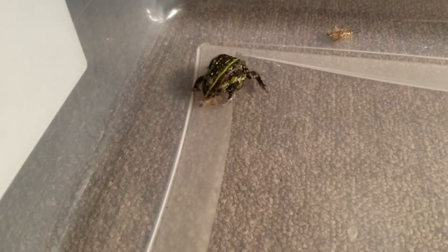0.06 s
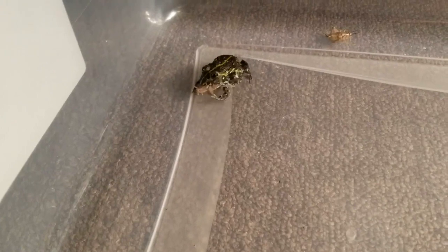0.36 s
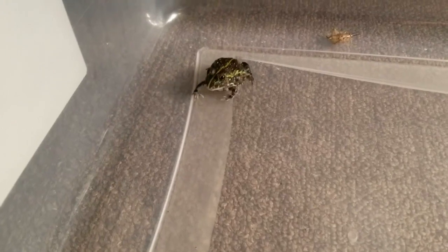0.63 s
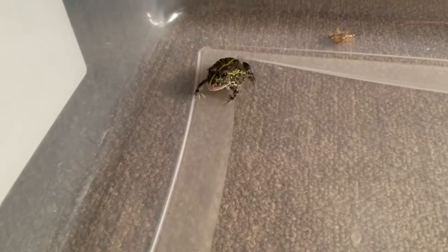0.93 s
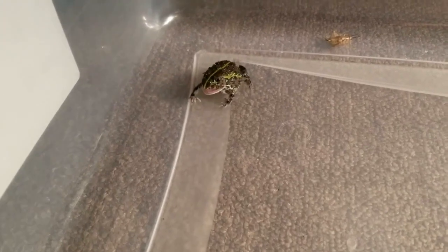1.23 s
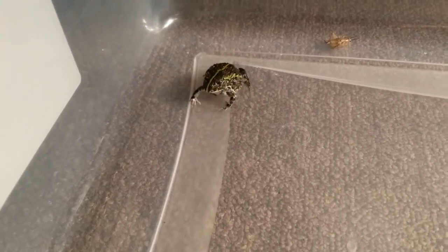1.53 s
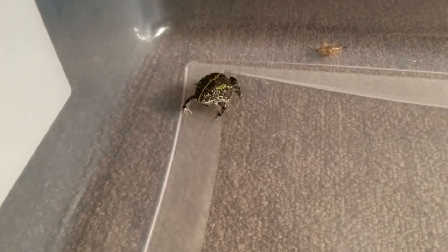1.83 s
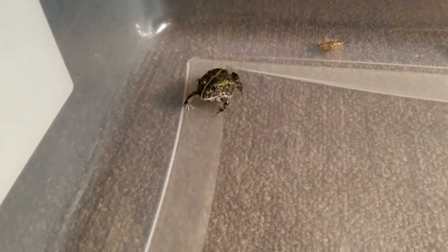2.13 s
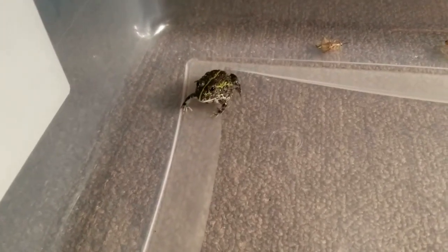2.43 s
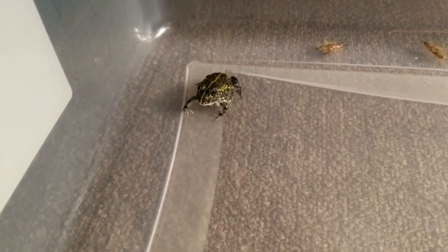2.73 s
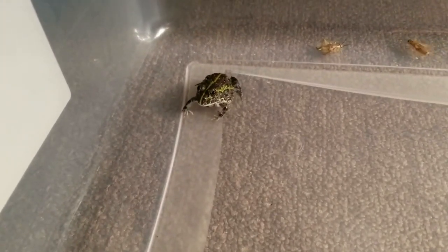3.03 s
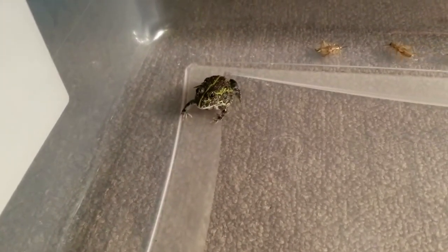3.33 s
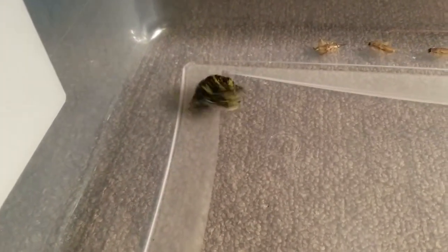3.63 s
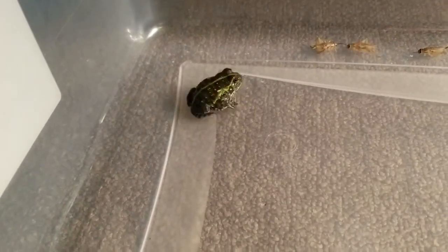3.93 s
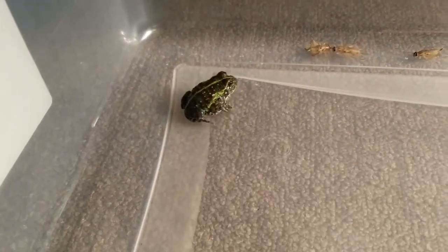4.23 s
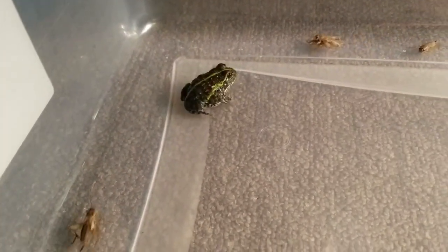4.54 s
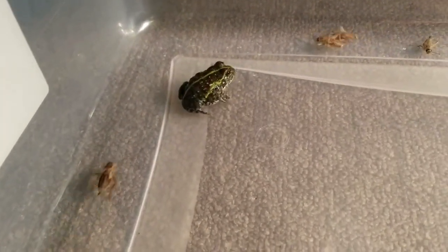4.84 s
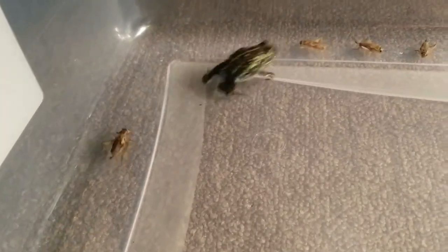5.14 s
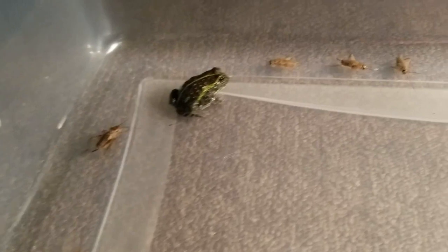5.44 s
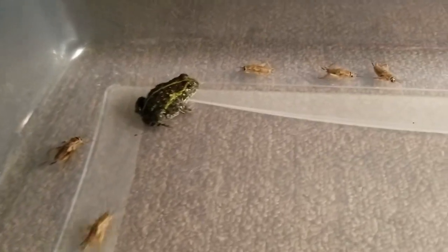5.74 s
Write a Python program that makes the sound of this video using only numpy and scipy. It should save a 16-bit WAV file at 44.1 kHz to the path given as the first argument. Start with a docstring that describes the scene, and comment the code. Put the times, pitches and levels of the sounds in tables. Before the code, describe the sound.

Crickets scrabble and tick across a plastic tub over a low room hum, after a few sharp, dry taps on the microphone.

```python
"""A frog and a handful of crickets in a plastic tub, on a pair of close microphones indoors.
An appliance hums in the room throughout, and at first the crickets barely stir. In the first second
and a half, four sharp dry taps and a few faint ones sound right at the left microphone. From about
2.5 s the crickets scrabble over the plastic: a dense rustle of tiny claw contacts shaking the walls,
with louder ticks and scuffs as they and the frog shift and hop."""
import sys
import numpy as np
from scipy import signal
from scipy.fft import rfft, irfft
from scipy.io import wavfile

SR = 44100
rng = np.random.default_rng(int(sys.argv[2]) if len(sys.argv) > 2 else 0)


def store_pcm(level_fs):
    """Save levels as 16-bit WAV."""
    pcm = np.round(np.clip(level_fs, -1, 1) * 32767).astype(np.int16)
    wavfile.write(sys.argv[1], SR, np.atleast_2d(pcm).T)


N = 263718
TIME = np.arange(N) / SR

# The fine, bright scratch of a claw on plastic. Each row: frequency in Hz, gain in dB.
SCRATCH_SPECTRUM = [(4000, -42.5), (8000, -2), (9500, 1), (11000, 3.5), (16000, 1)]


def from_db(db):
    """Decibels as an amplitude factor."""
    return 10 ** (np.asarray(db) / 20)


def rms_one(x):
    """Scale a signal to an rms of 1."""
    return x / np.sqrt(np.mean(x ** 2) + 1e-20)


def at_hz(points, hz):
    """Read a table on a log-frequency axis."""
    f, value = np.transpose(points)
    return np.interp(np.log(np.maximum(hz, 1)), np.log(f), value)


def colour(x, spectrum, size=16384):
    """Causal (minimum-phase) filter with the given (Hz, dB) response."""
    gain = from_db(at_hz(spectrum, np.arange(size // 2 + 1) * SR / size))
    cepstrum = irfft(np.log(gain))
    cepstrum[1:size // 2] *= 2
    cepstrum[size // 2 + 1:] = 0
    response = irfft(np.exp(rfft(cepstrum)))[:min(size // 2, x.shape[-1])]
    return signal.oaconvolve(x, response if x.ndim == 1 else response[None], axes=-1)[..., :x.shape[-1]]


def drift(per_s):
    """A random wander that glides through per_s new values a second."""
    return np.interp(TIME * per_s, np.arange(N), rng.standard_normal(N))


def room_tone(air_db=-47.5):
    """An appliance's mains and motor tones beat over dull air noise, alike on both sides in the bass."""
    # The appliance's tones. Each row: frequency in Hz, level in dB before the swell.
    hum_tones = [(58.2, -64.5), (120, -56), (132.8, -48.5), (180, -66), (265.7, -68.5), (360, -70.5),
                 (480, -91)]
    # Air and rumble of the room. Each row: frequency in Hz, relative level in dB.
    air_spectrum = [(20, -19), (40, -30), (55, -13), (75, -15), (90, -5.5), (105, -7), (138, 0.5),
                    (170, -11), (260, -10), (320, -18), (390, -20.5), (455, -11), (580, -22.5),
                    (900, -17.5), (1150, -21), (1450, -24.5), (2200, -23), (3200, -26.5), (6000, -39),
                    (8200, -88), (11000, -40.5), (16000, -64)]
    # How alike the air is at the two microphones. Each row: frequency in Hz, correlation.
    likeness = [(130, 1), (290, 0.75), (640, 0.13), (1400, -0.44), (3000, 0.19)]
    # Hum and rumble waver slowly. Each row: time in seconds, gain of the hum in dB.
    swell = [(0, 0.5), (0.95, -1), (1.15, -2.5), (1.5, -2.5), (2.3, 0.5), (4.6, 0), (4.85, 2), (5.6, -0.5),
             (5.98, 1)]
    hum = sum(np.sqrt(2) * from_db(db) * np.sin(2 * np.pi * (hz * TIME + rng.random()))
              for hz, db in hum_tones)
    alike = at_hz(likeness, np.arange(N // 2 + 1) * SR / N)
    mid, side = rfft(rng.standard_normal((2, N)))
    noise = irfft(np.sqrt(1 + alike) * mid + np.sqrt(1 - alike) * side * [[1], [-1]], N)
    air = rms_one(colour(noise, air_spectrum))
    swell_db = np.interp(TIME, *np.transpose(swell))
    return from_db(swell_db) * hum + from_db(air_db + 0.75 * swell_db) * air


def tub_echoes(early_t60, late_t60, early_db, late_db, size=8192):
    """A contact, its quick reflections between the walls and a tail, different at each microphone."""
    t = np.arange(size) / SR
    early, late = rng.standard_normal((2, 2, size))
    echoes = sum(from_db(db) * rms_one(noise * from_db(-60 * t / t60)) / np.sqrt(size)
                 for noise, t60, db in [(early, early_t60, early_db), (late, late_t60, late_db)])
    echoes[[0, 1], rng.integers(0, 12, 2)] += 1  # the direct sound, with its own delay on each side
    return echoes


def tub_walls(x):
    """The thin plastic answers broadly, with a few damped resonances on top."""
    # Wall resonances. Each row: frequency in Hz, width in Hz, gain in dB against the broad response.
    modes = [(1150, 124, 5.5), (2240, 49, -6.5), (2870, 250, -17), (4470, 64, -13), (5500, 71, -16)]
    # The walls' broad response. Each row: frequency in Hz, gain in dB.
    wall_spectrum = [(120, -7.5), (250, -3.5), (400, -6.5), (700, -2), (950, -11.5), (1500, -4), (2600, 1),
                     (5200, 2.5), (6300, -1.5), (7300, -8), (8300, -18), (16000, -82.5)]
    ringing = sum(from_db(db) * resonance(x, hz, width) for hz, width, db in modes)
    return colour(x + ringing, wall_spectrum)


def resonance(x, hz, width_hz):
    """Two-pole resonance, gain 1 at its peak."""
    r = np.exp(-np.pi * width_hz / SR)
    feedback = [1, -2 * r * np.cos(2 * np.pi * hz / SR), r * r]
    return signal.lfilter(np.array([1, 0, -1]) * (1 - r * r) / 2, feedback, x)


def microphone_taps(right_db, size=2048):
    """Sharp pushes of pressure with no ring at the left microphone; the right gets only a trace."""
    # Each row: start in seconds, peak in dB, frequency in Hz above which the tap is dulled.
    taps = [(0.6472, 1, 5950), (0.765, -8, 4130), (0.8096, -10, 3700), (0.855, -30.5, 2400),
            (0.928, -30.5, 1700), (0.944, -31, 1800), (1.3939, -10.5, 8950)]
    # The colour all taps share. Each row: frequency in Hz, gain in dB.
    tap_spectrum = [(100, -5), (400, -5.5), (1100, 3.5), (2600, 5), (5500, 2), (7000, -3.5), (9000, -22),
                    (12000, -16), (16000, 1)]
    out = np.zeros((2, N))
    for s, peak_db, dull_hz in taps:
        push = signal.lfilter(*signal.butter(2, dull_hz, fs=SR), signal.unit_impulse(size))
        push = colour(push, tap_spectrum)
        push *= from_db(peak_db) / np.abs(push).max()
        start = round(s * SR)
        out[0, start:start + size] -= push
        echoes = tub_echoes(early_t60=0.028, late_t60=0.083, early_db=7, late_db=4)
        out[1, start:start + size] -= from_db(right_db) * signal.fftconvolve(push, echoes[1])[:size]
    return out


def scuffs(size=16384):
    """A dragged leg or the frog's belly rubs one patch of the wall into a short resonant swell."""
    # Each row: middle in seconds, half-length in seconds, pitch in Hz, width in Hz, level in dB.
    drags = [(0.138, 0.063, 4500, 1300, -51.5), (0.721, 0.02, 6600, 700, -56),
             (1.21, 0.051, 4900, 600, -59), (1.225, 0.035, 15200, 1200, -67),
             (1.34, 0.06, 14500, 2500, -70), (1.399, 0.012, 3280, 400, -49.5),
             (1.521, 0.032, 650, 300, -52), (1.559, 0.017, 5260, 1400, -54.5),
             (1.767, 0.04, 11000, 2500, -69), (1.85, 0.04, 4520, 800, -56), (1.928, 0.038, 2430, 400, -57),
             (1.936, 0.05, 11500, 2500, -71), (2.278, 0.039, 3620, 600, -55),
             (2.33, 0.04, 10800, 2000, -71), (2.74, 0.047, 5500, 1500, -49.5),
             (3.226, 0.009, 2340, 160, -31), (3.229, 0.013, 1120, 500, -41.5),
             (3.661, 0.028, 2270, 400, -47), (3.673, 0.012, 930, 800, -42.5),
             (4.085, 0.045, 4670, 700, -42), (5.469, 0.0076, 4150, 700, -36.5),
             (5.48, 0.11, 2500, 600, -52.5)]
    out = np.zeros((2, N))
    t = (np.arange(size) - size // 2) / SR
    for middle, half_length, hz, width, db in drags:
        friction = rng.standard_normal((2, size))
        rub = rms_one(resonance(resonance(friction, hz, width), hz, 2 * width))
        scuff = from_db(db) * rub * np.exp(-2 * (t / half_length) ** 2)
        at = np.round((middle + t) * SR).astype(int)
        heard = (at >= 0) & (at < N)
        out[:, at[heard]] += scuff[:, heard]
    return out


def movement(attack_s=0.0039, release_db_per_s=353):
    """Levels in dB of the rustle and of the fine scratch: steady walking with quick dashes on top."""
    # How busily the crickets walk about. Each row: time in seconds, rustle level in dB.
    walking = [(0, -58.5), (0.95, -57.5), (1.05, -60.5), (1.15, -58), (1.3, -56.5), (1.5, -56),
               (1.8, -56.5), (2.2, -57), (2.55, -54), (2.85, -50.5), (3.3, -49), (3.8, -46), (4.2, -46),
               (4.35, -48.5), (4.63, -46), (4.72, -50), (4.8, -55.5), (4.89, -48.5), (4.95, -45),
               (5.33, -49), (5.53, -46), (5.62, -52), (5.68, -53.5), (5.8, -46.5), (5.98, -43.5)]
    # Dashes over the plastic. Each row: start and length in seconds, rustle and scratch levels in dB.
    dashes = [(0.0, 0.022, -54, -65), (0.174, 0.056, -55.5, -64), (0.362, 0.085, -58, -63.5),
              (0.61, 0.13, -62, -70), (1.594, 0.034, -67, -69), (2.26, 0.046, -55.5, -76),
              (2.447, 0.22, -61, -61.5), (2.693, 0.084, -53, -56.5), (2.9, 0.1, -63, -64),
              (3.01, 0.084, -46.5, -51.5), (3.188, 0.068, -42, -47.5), (3.346, 0.046, -52, -58),
              (3.417, 0.068, -48, -53), (3.507, 0.036, -58, -50), (3.638, 0.04, -39, -42),
              (3.885, 0.041, -44.5, -47), (4.01, 0.11, -44, -50), (4.428, 0.05, -59, -54),
              (4.96, 0.03, -45, -52), (5.003, 0.058, -46.5, -51), (5.171, 0.11, -44, -50.5),
              (5.423, 0.12, -50.5, -58), (5.688, 0.032, -44, -50), (5.752, 0.065, -44.5, -50.5),
              (5.876, 0.022, -40, -44.5)]
    walk_db = np.interp(TIME, *np.transpose(walking))
    walk_scratch_db = -55.5 + 1.26 * (walk_db + 47)  # the scratch grows faster than the rustle
    power = from_db([walk_db, walk_scratch_db]) ** 2
    for start, length, rustle_db, scratch_db in dashes:
        attack = np.clip((TIME - start) / attack_s, 0, 1)
        release = from_db(-release_db_per_s * np.maximum(TIME - start - length, 0))
        power += (from_db([[rustle_db], [scratch_db]]) * attack * release) ** 2
    return 10 * np.log10(power)


def claws(per_spot_per_s, spread_db, clump_db, spots=8):
    """Clumps of tiny contacts at many spots in the tub, each spot with echoes of its own."""
    out = np.zeros((2, N))
    for _ in range(spots):
        at = np.flatnonzero(rng.random(N) < per_spot_per_s / SR)
        # mostly faint touches, a few firm ones, pushing or pulling the wall
        lightness, push = rng.random((2, N))[:, at]
        size_db = spread_db * np.minimum(-np.log(lightness), 3) + clump_db * np.tanh(drift(60)[at])
        clicks = np.zeros(N)
        clicks[at] = np.sign(push - .5) * from_db(size_db)
        echoes = tub_echoes(early_t60=0.038, late_t60=0.032, early_db=2.5, late_db=-9.5)
        out += signal.oaconvolve(clicks[None], echoes, axes=1)[:, :N]
    return rms_one(out)


def light_steps(per_s, spread_db):
    """Lone claws catch on the plastic at random: separate short snaps."""
    chance, push, size = rng.random((3, N))
    clicks = (chance < per_s / SR) * np.sign(push - .5) * from_db(spread_db * (1 - 2 * size))
    echoes = tub_echoes(early_t60=0.031, late_t60=0.043, early_db=-7, late_db=-2)
    return rms_one(signal.oaconvolve(clicks[None], echoes, axes=1)[:, :N])


def shifting_bands(x, low_hz, high_hz, sway_db, per_s, count=20):
    """As the feet move over the wall, overlapping bands swell and fade too briefly to give a pitch."""
    centres = np.linspace(low_hz, high_hz, count)
    hz = np.arange(N // 2 + 1) * SR / N
    spectrum = rfft(x)
    bands = (irfft(spectrum * np.interp(hz, centres, weights), N) for weights in np.eye(count))
    return sum(from_db(sway_db * np.tanh(drift(per_s))) * band for band in bands)


def scrabble(step_knock_db=-14.5, step_snap_db=-7):
    """The crickets' claws shake the walls and give a fine scratch; gentle movement is a smoother slide."""
    rustle_db, scratch_db = movement()
    stepping = 0.9 * np.clip((scratch_db + 66) / 18, .1, 1)  # share of power; the rest is sliding
    touches = claws(per_spot_per_s=200, spread_db=4.0, clump_db=3.0)
    slide = rng.standard_normal((2, N))
    contacts = np.sqrt(stepping) * touches + np.sqrt(1 - stepping) * slide
    steps = stepping * light_steps(per_s=22, spread_db=0.5)
    knocks = contacts + from_db(step_knock_db) * steps
    rustle = tub_walls(shifting_bands(knocks, low_hz=900, high_hz=6550, sway_db=5.0, per_s=24))
    scratch = colour(contacts + from_db(step_snap_db) * steps, SCRATCH_SPECTRUM)
    return from_db(rustle_db) * rms_one(rustle) + from_db(scratch_db) * rms_one(scratch)


def footfalls(ring_width_hz, ring_db):
    """Each firmer step rings its own patch of wall for a few milliseconds; the claw's snap is drier."""
    # Each row: start in seconds, level in dB, ring in Hz, claw snap against the wall's answer in dB,
    # left minus right in dB.
    firm_steps = [(0.4179, -44.5, 2520, -21, -7), (2.529, -46, 5400, -12, -2), (2.595, -47, 2230, -2, 2),
                  (2.6952, -44.5, 3300, -3, 0), (2.7163, -48, 4700, -16, 2), (2.8642, -37.5, 2580, -9, -5),
                  (2.8872, -50, 5000, -1, 7), (2.9119, -41, 3000, -6, -2), (3.0695, -43.5, 1140, -8, 2),
                  (3.0848, -44, 4500, 10, 3), (3.2062, -36.5, 5600, -18, 1), (3.2201, -35, 2300, -22, 3),
                  (3.241, -30.5, 5670, -4, 0), (3.355, -45.5, 2280, -12, 6), (3.4246, -47, 5000, 3, 0),
                  (3.4455, -45, 2500, -12, -2), (3.465, -33, 5860, -8.5, 2), (3.5094, -36.5, 5700, -7, -1),
                  (3.5523, -36.5, 4500, 4, 1), (3.6237, -43, 4500, 4, -1), (3.6446, -37.5, 2400, 6, -3),
                  (3.6582, -38, 4500, 1, 1), (3.666, -40, 5000, 0, -2), (3.677, -40.5, 4440, 1, 6),
                  (3.7384, -43, 1690, -19, -1), (3.771, -42.5, 4370, -5, 6), (3.8348, -43, 2340, -14, 0),
                  (3.862, -47, 2510, 8, 9), (3.889, -38, 4700, 2, 0), (3.9162, -41.5, 4300, -17, -10),
                  (3.9802, -44.5, 2400, -20, -8), (4.0194, -37, 4700, -1, 5), (4.0464, -44, 4700, 2, 3),
                  (4.066, -41, 4600, -3, 7), (4.0848, -35, 4700, -7, 1.5), (4.1183, -43.5, 5000, -1, 5),
                  (4.144, -41, 4500, -7, 1), (4.2162, -44, 4500, -7, -1), (4.421, -44.5, 4700, 10, 6),
                  (4.4373, -47, 5000, 2, 0), (4.459, -41.5, 6160, -5, 1), (4.5233, -40.5, 4600, 0, 1),
                  (4.5824, -37.5, 5560, -2, -1), (4.6081, -43, 2980, -11, 3), (4.902, -38.5, 2670, -10, 0),
                  (4.9303, -39.5, 2780, -4, 3), (4.9372, -44, 2500, -5, -3), (5.011, -42.5, 1500, -5, 2),
                  (5.0252, -40.5, 4500, -1, 10), (5.0306, -40.5, 3000, -1, 0), (5.0511, -40.5, 4800, -4, 0),
                  (5.0654, -36.5, 2470, -3, 5.5), (5.0834, -43, 2800, -13, -3), (5.1487, -40, 2990, 1, 3),
                  (5.189, -43.5, 4500, -3, 5), (5.2147, -42, 1150, -6, 0), (5.2434, -42, 4500, -6, 1),
                  (5.2514, -41.5, 3000, -10, 4), (5.271, -39, 4340, -9, 2), (5.3393, -36, 4380, -4.5, 4),
                  (5.403, -42.5, 2880, -4, 0), (5.4668, -39, 5800, -13, 9), (5.5185, -42.5, 3500, -4, 3),
                  (5.6874, -36.5, 5590, -13, 2), (5.747, -39.5, 4750, -5, 3), (5.8076, -40, 4500, 0, -1),
                  (5.8836, -40, 4500, -4, 7), (5.8924, -44, 4580, 7, 9), (5.942, -36, 5750, -7.5, 5)]
    out = np.zeros((2, N))
    for s, level_db, hz, snap_db, pan_db in firm_steps:
        hit = tub_echoes(early_t60=.018, late_t60=.08, early_db=1, late_db=-8)
        snap = tub_echoes(early_t60=.012, late_t60=.06, early_db=-1, late_db=-10)
        tick = tub_walls(hit + from_db(ring_db) * resonance(hit, hz, ring_width_hz))
        tick += from_db(snap_db) * colour(snap, SCRATCH_SPECTRUM)
        tick /= np.std(tick[:, :SR // 100])  # the first 10 ms set the level
        tick *= from_db(level_db + pan_db * np.array([[.5], [-.5]]))
        start = round((s + .001) * SR)
        out[:, start:start + tick.shape[1]] += tick[:, :N - start]
    return out


def scene():
    """Tub and room reach two microphones of unlike colour; the taps act on the left one directly."""
    # The microphones' responses. Each row: frequency in Hz, left minus right in dB.
    balance = [(60, 4), (200, -1.5), (380, 5.5), (700, 1.5), (2400, -2), (5000, -2), (8000, 2),
               (11500, -0.5), (15000, 9.5)]
    tub = scrabble() + scuffs() + footfalls(ring_width_hz=780, ring_db=5.0)
    airborne = tub + room_tone()
    left = colour(airborne[0], [(hz, db / 2) for hz, db in balance])
    right = colour(airborne[1], [(hz, -db / 2) for hz, db in balance])
    return np.array([left, right]) + microphone_taps(right_db=-32.5)


def record(dry):
    """The recorder clips at full scale and cuts the top steeply above 15.9 kHz."""
    lowpass = signal.ellip(10, .2, 70, 15900, fs=SR, output="sos")
    return signal.sosfilt(lowpass, np.clip(dry, -1, 1))


dry = scene()
out = record(dry)
store_pcm(out)
```